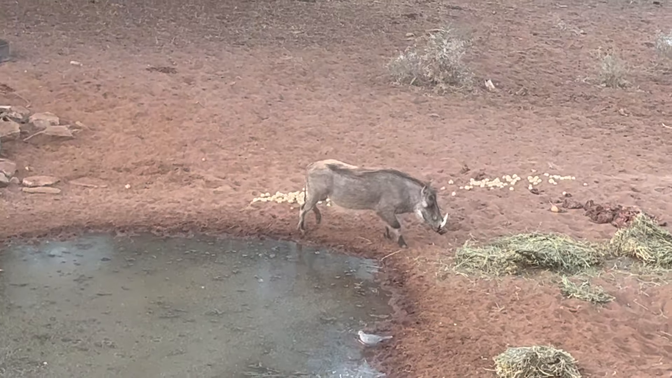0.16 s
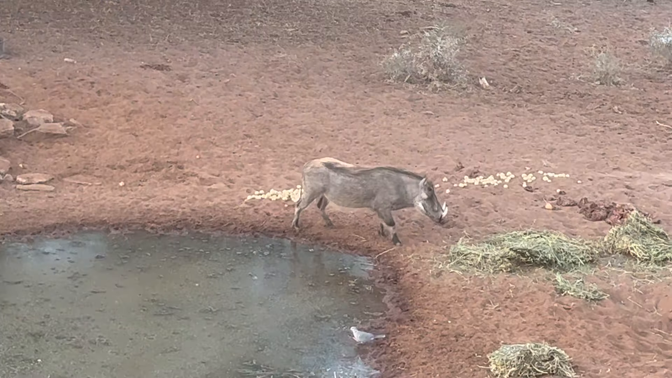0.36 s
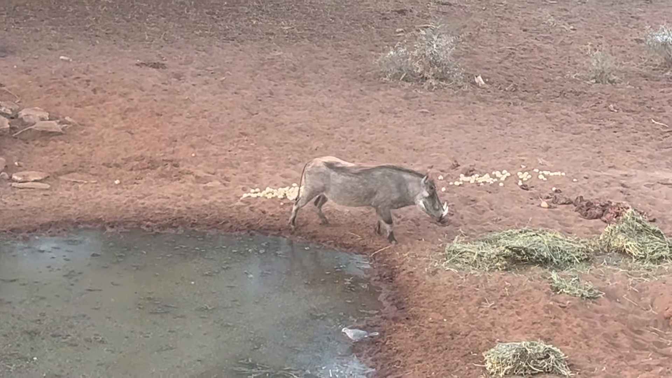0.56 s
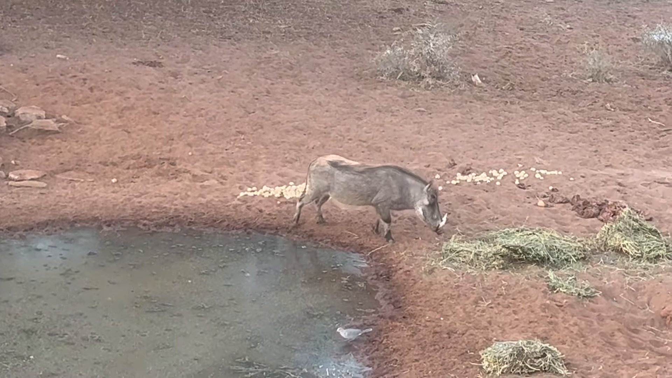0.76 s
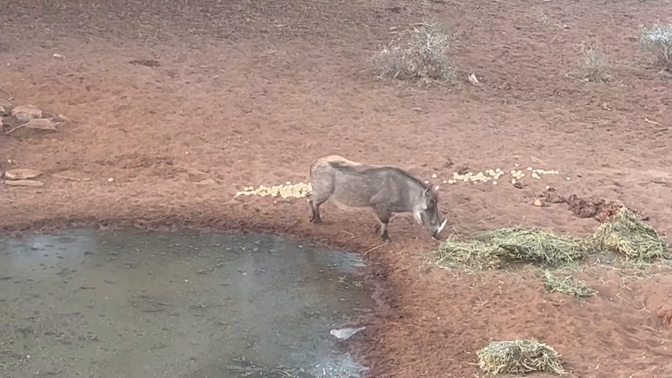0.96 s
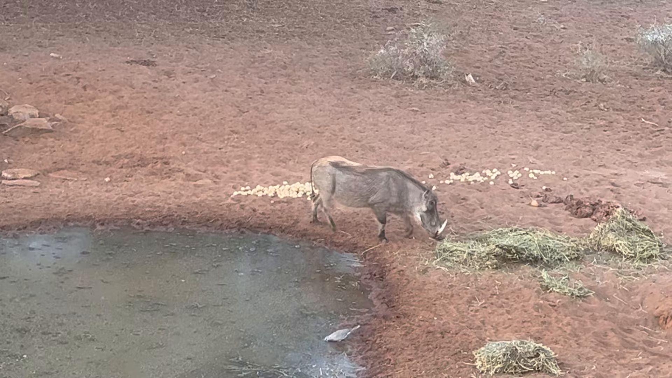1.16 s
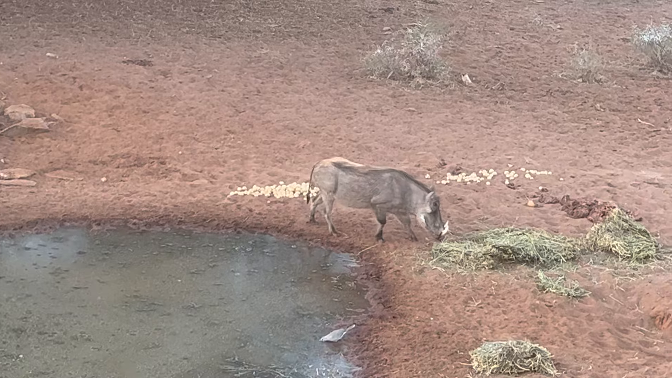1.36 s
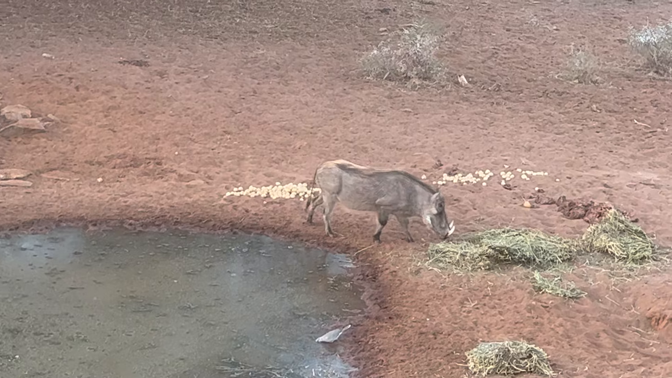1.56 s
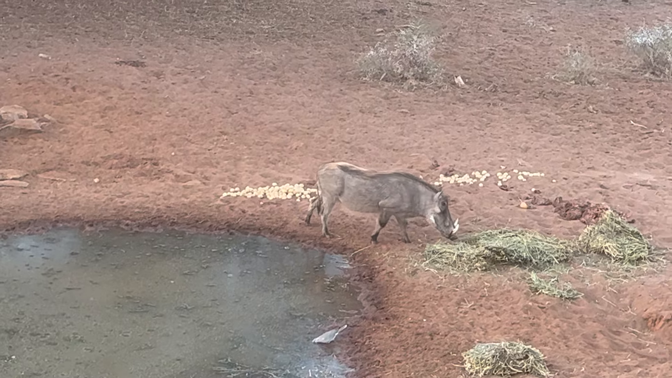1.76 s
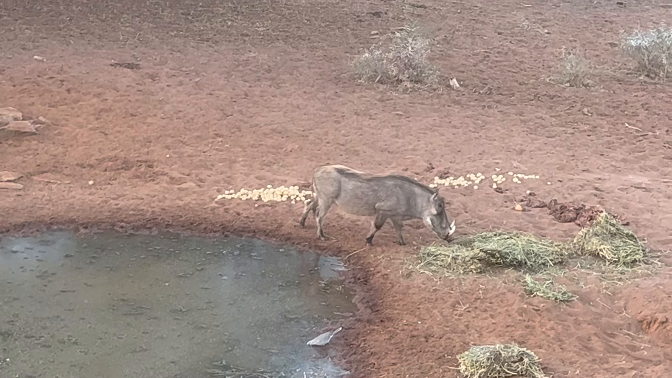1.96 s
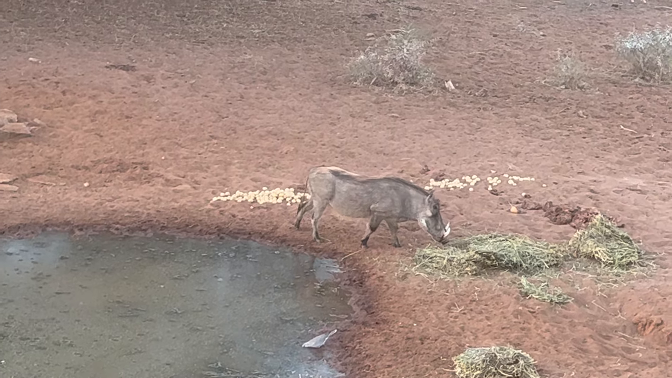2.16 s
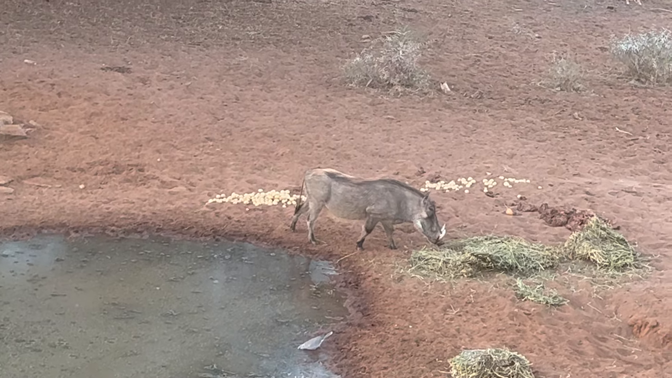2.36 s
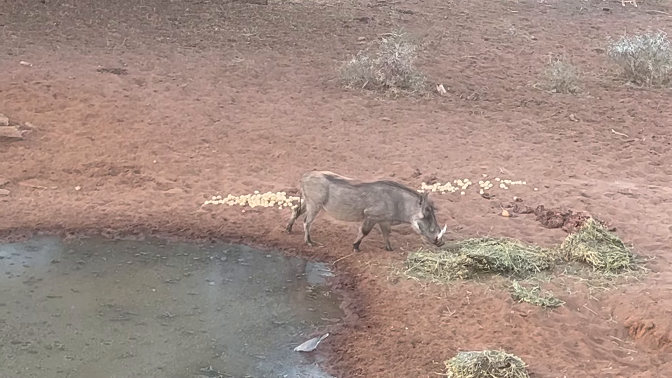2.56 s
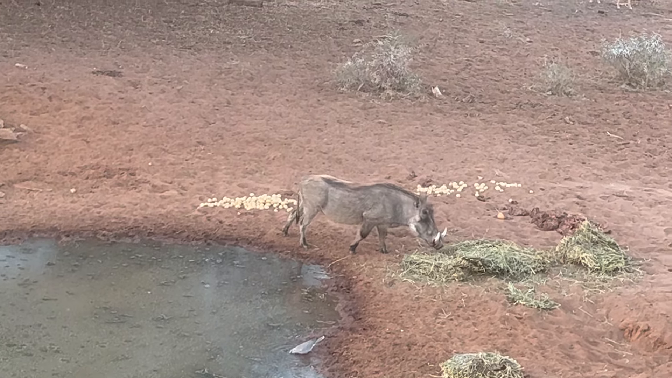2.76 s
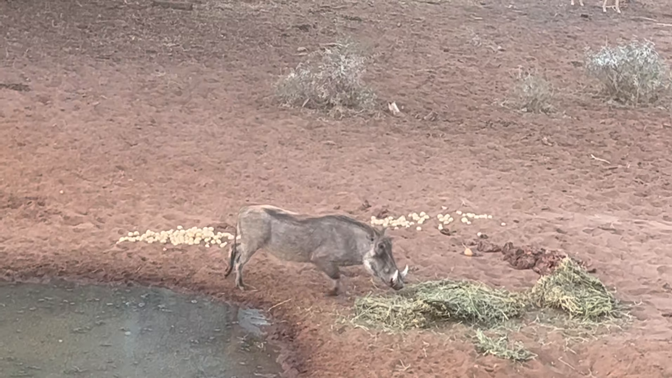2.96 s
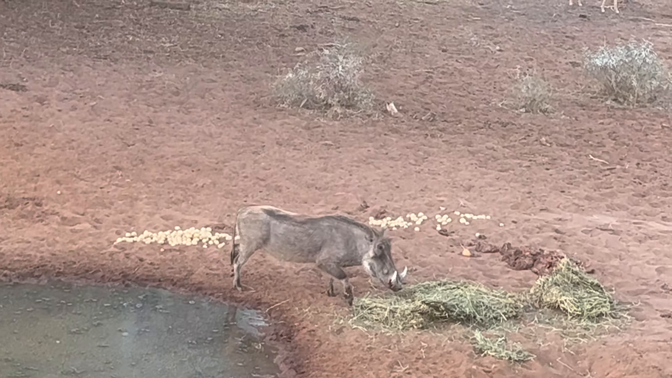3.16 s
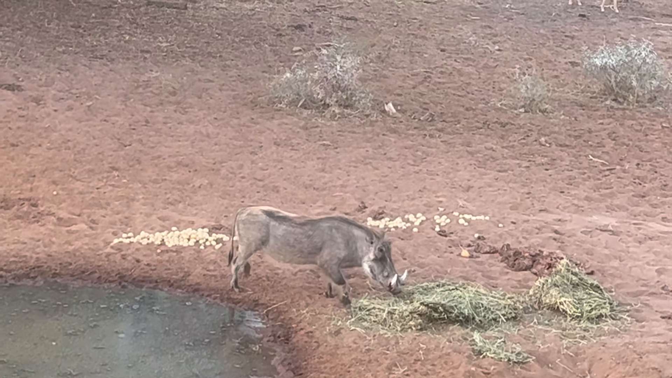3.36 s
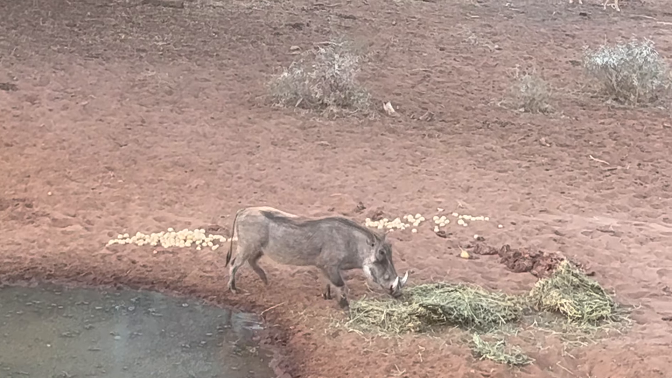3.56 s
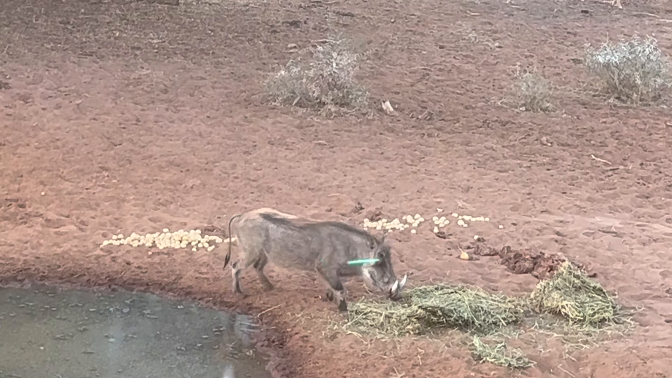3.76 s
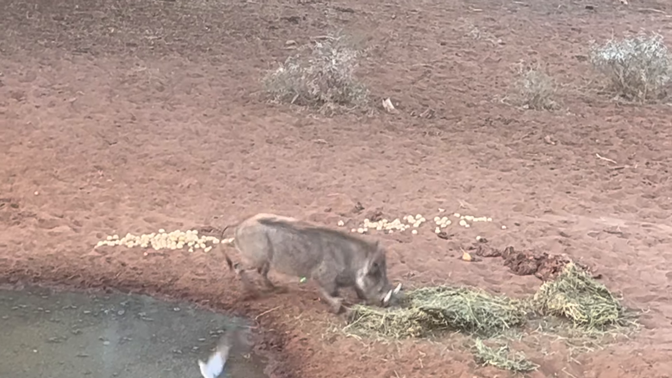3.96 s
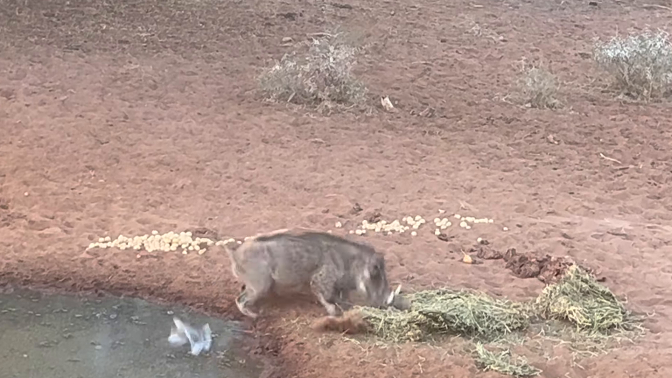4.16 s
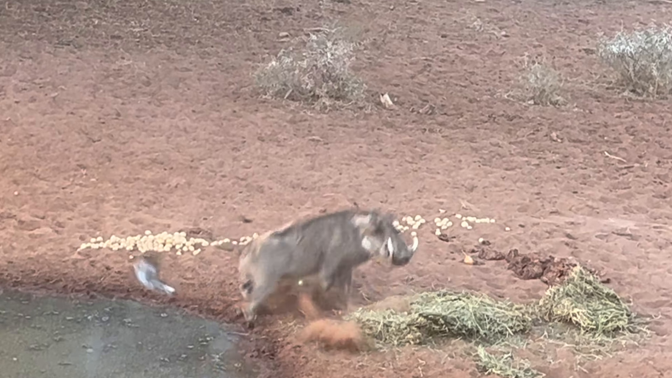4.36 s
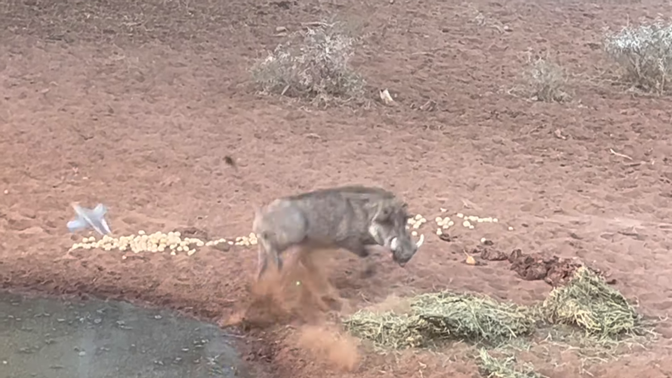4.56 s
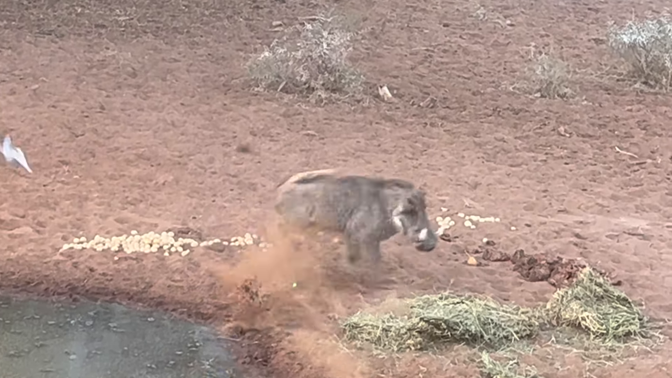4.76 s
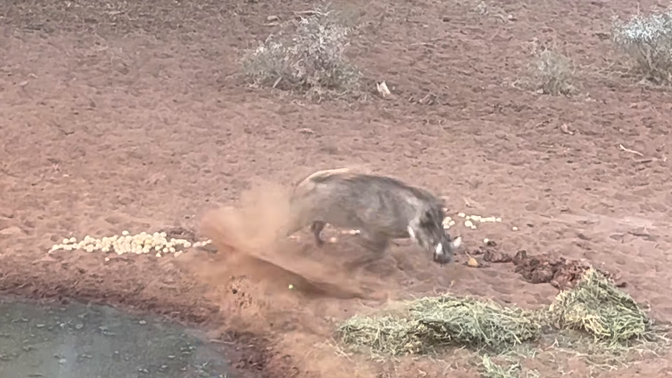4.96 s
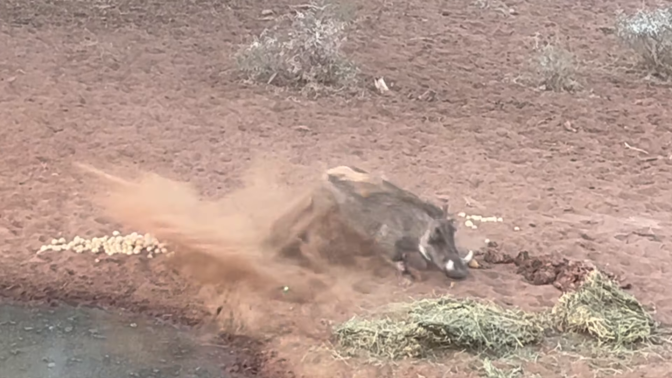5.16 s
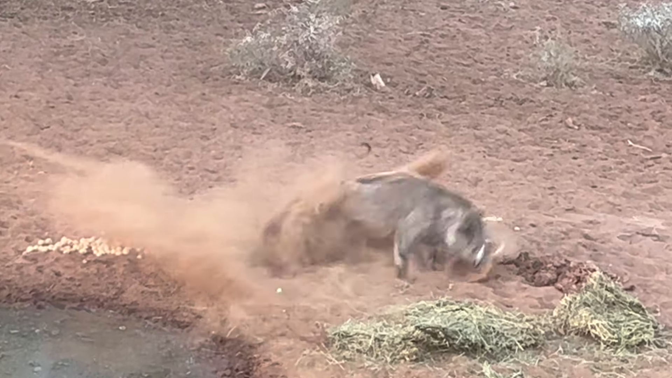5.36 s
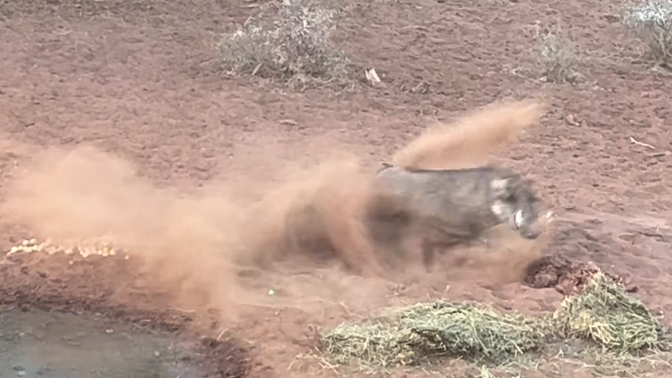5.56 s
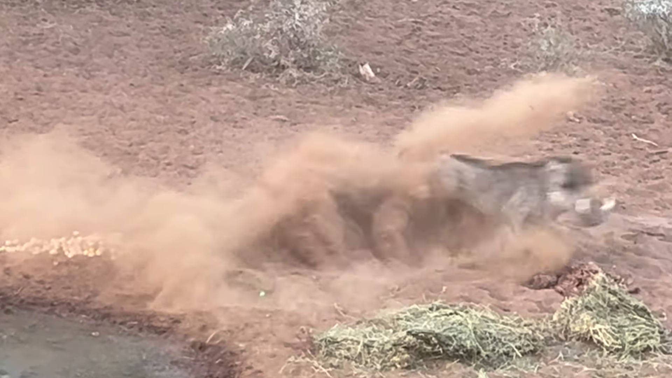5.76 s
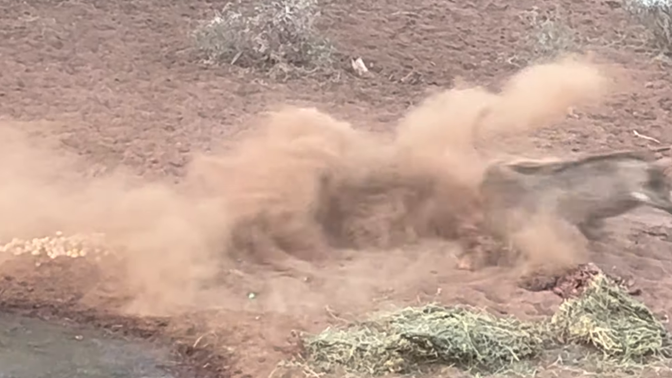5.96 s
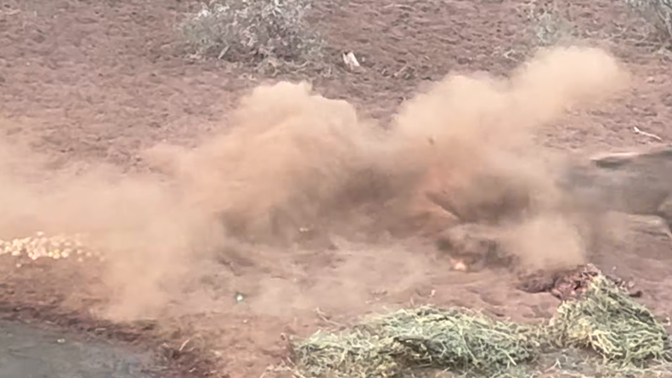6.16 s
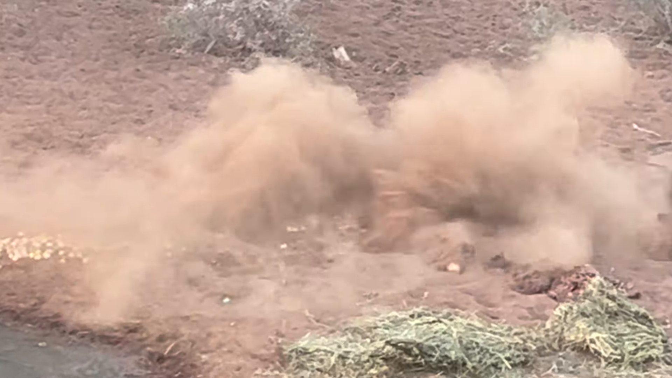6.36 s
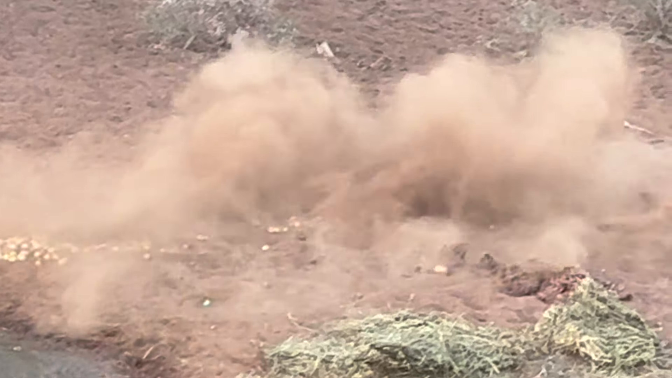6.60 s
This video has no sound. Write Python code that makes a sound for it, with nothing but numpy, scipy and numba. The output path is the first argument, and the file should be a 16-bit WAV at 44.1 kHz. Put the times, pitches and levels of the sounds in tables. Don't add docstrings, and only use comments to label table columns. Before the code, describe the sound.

Stereo handheld pickup from a hide, with a loose, phasey treble. First a calm of faint twittering birds, short coos, ticks and puffs of wind; then an abrupt change to half speed. A brief breathy whistle and sliding shaft lead to one enormous crack with a ringing thump, followed by a smaller arrow impact. Coarse low pig growls rattle over stamping, sandy scuffling, then fade, leaving thuds and sharp grit clicks.

```python
import sys
import numpy as np
from scipy import signal
from scipy.fft import rfft, irfft
from scipy.io import wavfile
from scipy.ndimage import uniform_filter1d
from numba import njit

SR = 44100
rng = np.random.default_rng(int(sys.argv[2]) if len(sys.argv) > 2 else 0)


def level_to_linear(level):
    exponent = np.asarray(level, float) / 20
    return 10 ** exponent


def generate_wav(sig):
    pcm = np.round(np.clip(np.atleast_2d(sig).T, -1, 1) * 32767).astype(np.int16)
    wavfile.write(sys.argv[1], SR, pcm)


N = 292383
T = np.arange(N) / SR
F = np.fft.rfftfreq(N, 1 / SR)
CUT_S = 3.0

# [t/s, level/dB]
BREEZE = [(0, -93), (.2, -81), (.38, -91), (.6, -82.5), (.8, -87.5), (1.42, -87.5), (1.55, -77.5),
          (1.8, -74), (2.0, -84), (2.18, -89), (2.37, -85.5), (3.0, -91)]
# [f/Hz, density/dB]
LEAF_COLOUR = [(300, 3.5), (700, 2), (2000, 3), (5000, -5), (8000, -8.5), (10000, -17), (12000, -37)]
# [f/Hz, density/dB]
TOP_AIR_COLOUR = [(9000, -18), (10500, -7.5), (11200, 0.5), (16300, -3.0)]
# [start t/s, level/dB, hold/s]
BUFFETS = [
    (.1, -69, 0.094),
    (1.5, -62, 0.32),
    (1.9, -58, 0.02),
    (2.3, -61.5, 0.053),
]
# [f/Hz, density/dB]
BUFFET_COLOUR = [(12, -36), (20, -8.5), (75, -1.5), (229, -11.5), (306, -10), (619, -22), (1700, -27),
                 (3300, -110)]
# [start t/s, level/dB, hold/s]
CHATTER = [(0, -63.5, 0.22), (.38, -66, 0.085), (.55, -61.5, 0.1), (.72, -67.5, 0.015), (.81, -64, 0.08),
           (1.04, -67, 0.14), (1.24, -65.5, 0.14), (1.5, -69.5, 0.52), (1.98, -68, 0.035),
           (2.21, -74, 0.55), (2.92, -72, 0.052)]
# [f/Hz, density/dB]
FAR_FLOCK_COLOUR = [(1400, -18), (1800, 7), (4000, 8), (4300, -2), (5300, -8), (5900, -27)]
# [t/s, peak level/dB, f/Hz, t60/s]
BUMPS = [(0.046, -48.5, 64, 0.2), (0.225, -59, 248, 0.083), (0.872, -47, 312, 0.019),
         (1.168, -46.5, 206, 0.048), (1.991, -46, 342, 0.028), (1.991, -46, 800, 0.022),
         (3.755, -46, 570, .05), (3.83, -41, 229, 0.076), (4.06, -46, 199, .1), (4.094, -36.5, 211, 0.082),
         (5.181, -30.5, 38.2, 0.68), (5.367, -2.5, 311, 0.0073), (5.861, -38, 49.3, 0.12),
         (6.265, -27, 78.9, 0.12)]
# [t/s, peak level/dB, f/Hz]
FOWL = [(.05, -81, 3500), (.09, -71, 1920), (.13, -64, 1910), (.229, -63, 3580), (.4, -70, 3300),
        (.469, -66, 3450), (.557, -68, 2000), (.631, -60, 2150), (.815, -61, 2130), (.83, -75, 3100),
        (.875, -69, 2300), (1.105, -62, 3240), (1.138, -65, 2350), (1.235, -53, 2100), (1.24, -62, 3320),
        (1.289, -66, 3380), (1.347, -64.5, 2520), (1.413, -58, 3420), (1.515, -56, 1900),
        (2.082, -59, 3400), (2.221, -60, 2230), (2.688, -58.5, 3330), (2.768, -63, 3240)]
# [t/s, peak level/dB, f/Hz]
CLUCKS = [(0.054, -70, 2610), (0.152, -59.5, 2590), (0.185, -66, 2690), (0.284, -64, 2610),
          (0.384, -71, 2580), (0.404, -62, 2650), (0.5897, -61, 2530), (0.655, -60.5, 2520),
          (0.735, -59, 2600), (0.84, -68, 2640), (1.0146, -63.5, 2620), (1.105, -65.5, 2650),
          (1.1668, -65, 2535), (1.301, -62.5, 2620), (1.319, -65.5, 2590), (1.3656, -62, 2550),
          (1.4857, -62, 2500), (1.515, -62, 2520), (1.556, -59, 2630)]
# [t/s, peak level/dB]
CALM_TICKS = [(0.8244, -62), (0.8694, -64), (1.07, -55), (1.7094, -65), (1.93, -59), (1.9894, -64),
              (2.08, -66), (2.181, -56.5), (2.3494, -60), (2.894, -56.5), (2.9034, -58.5)]
# [t/s, peak level/dB, f/Hz]
DOVE = [(2.0582, -54, 1110), (2.108, -60, 1150), (2.148, -58, 1056), (2.246, -55, 1107),
        (2.3352, -55.5, 1060), (2.445, -58, 1110), (2.52, -60, 1135), (2.6933, -61.5, 1160),
        (2.76, -58, 1080), (2.86, -62, 1085), (2.952, -61.5, 1000), (3.426, -48, 1385), (3.3997, -59, 1130)]
# [t/s, level/dB]
SCUFFLE = [(3.0, -85), (3.24, -81.5), (3.28, -79.5), (3.46, -71), (3.85, -57), (4.3, -42), (4.8, -55),
           (5.05, -53.5), (5.35, -62), (5.75, -50), (6.04, -60), (6.25, -62), (6.43, -59.5), (6.63, -58.5)]
# [f/Hz, density/dB]
SAND_COLOUR = [(120, -5.5), (250, 4), (700, 9), (1500, 3), (3000, -30), (5000, -57.5)]
# [f/Hz, density/dB]
DUST_COLOUR = [(1500, 6.5), (3000, 2.5), (4500, 0), (6000, 4), (8000, -7), (9900, -15)]
# [start t/s, level/dB, hold/s]
STAMPS = [(3.495, -31.5, .03), (3.7, -45.5, 0.038), (3.9, -43, .16), (4.13, -32.5, 0.17), (4.46, -40, 0.18),
          (4.81, -31, 0.044), (5.13, -37.5, 0.027), (5.35, -39, .12), (5.68, -63.5, 0.021),
          (6.0, -50, 0.12), (6.23, -41, 0.077), (6.5, -53.5, .1)]
# [f/Hz, density/dB]
GROUND_COLOUR = [(11, -51), (18, -3.5), (38, -1.5), (133, -7.5), (264, -16), (490, -25.5), (650, -41),
                 (1100, -120)]
# [t/s, level/dB, f/Hz]
WHISTLE = [(3.26, -89, 1050), (3.29, -70, 1070), (3.315, -73, 1110), (3.33, -70, 1280), (3.355, -75, 1330),
           (3.385, -79, 1400)]
# [t/s, peak level/dB, dull side level/dB]
GRIT = [(3.327, -60.5, -25), (3.406, -63, -12), (4.0468, -55.5, 16), (5.0652, -68.5, -15), (5.11, -46.5, 2),
        (5.2787, -56, 14.5), (5.45, -59, 17), (5.66, -47, 14), (5.8194, -58, 12), (5.8308, -70, 33),
        (5.9598, -41, -34), (5.9796, -41.5, -16), (6.0364, -54, 6), (6.0544, -31.5, -7.5), (6.095, -59, 3),
        (6.1268, -41, -19), (6.1455, -32, -22), (6.1499, -37, -15), (6.1674, -50, 0), (6.206, -62, 14.5),
        (6.2207, -59.5, 17.5), (6.258, -38.5, -0.5), (6.401, -66, 17), (3.272, -78, 11), (5.462, -55, 11),
        (5.642, -58, 12), (6.08, -64, 3), (6.188, -60, 7)]
# [t/s, crack level/dB, crack f/Hz, thud level/dB, tail level/dB]
BLOWS = [
    (3.4337, -34, 4030, -76, -61.5),
    (3.4417, -19, 4700, -68.5, -57.5),
    (3.4476, -22, 6170, -56, -52),
    (3.482, -18.5, 1300, -71, -70),
    (3.4884, 0, 6970, -21.5, -22.5),
    (3.8783, -21, 5100, -22, -37),
    (3.883, -12, 2700, -57.5, -61.5),
    (3.901, -8, 2340, -46.5, -41),
]
# [f/Hz, level/dB, t60/s]
BOW_MODES = [(92.6, -13.5, 0.52), (172.5, -4.5, 0.45), (156.3, -7, 1.0), (547, -23.5, 1), (1476, 0.5, 0.2),
             (3500, 2.5, 0.071), (7420, 16, .035)]
# [f/Hz, level/dB, t60/s]
HIDE_MODES = [(87.4, -12.5, 0.97), (170, -21, 0.27), (402, -12.5, 0.21), (830, -5.5, 0.4),
              (1510, -0.5, 0.34), (2825, -5.5, 0.032), (4060, 0.5, 0.27), (6500, -13, 0.4),
              (8600, -34, .35)]
# [t/s, level/dB]
SHAFT = [
    (3.45, -41),
    (3.466, -37.5),
    (3.472, -28.5),
    (3.487, -38),
    (3.49, -41),
]
# [t/s, rate/Hz]
FLAP_RATE = [
    [(4.14, 25.5), (4.2, 27.9), (4.222, 57.7), (4.25, 23.6), (4.29, 36.6), (4.39, 40.9), (4.51, 35.3),
     (4.57, 46.8), (4.62, 32.2), (4.772, 23.1)],
    [(4.809, 29.9), (4.883, 34.7), (4.955, 38.3)],
    [(5.106, 35.1), (5.177, 19.8), (5.249, 21.0), (5.32, 23.3)],
    [(5.365, 18.3), (5.43, 31.4), (5.5, 27.6), (5.56, 36.8), (5.61, 31.4), (5.67, 50.0), (5.75, 32.9),
     (5.83, 33.9)],
]
# [t/s, effort level/dB, throat f/Hz, mouth opening/dB, chest f/Hz]
EFFORT = [
    [(4.15, -42.5, 593, -1, 128.8), (4.185, -34.5, 590, 5.5, 128.5), (4.245, -32.5, 636, -9.5, 189.5),
     (4.31, -33, 562, -8, 135.4), (4.41, -28, 570, 2, 115.4), (4.485, -32.5, 562, -5.5, 101.2),
     (4.55, -24, 620, -8, 120.5), (4.64, -25.5, 564, -9, 217), (4.79, -45.5, 555, -6.5, 219.6)],
    [(4.82, -34.5, 587, -13, 226.8), (4.86, -30.5, 443, -3.5, 216.1), (4.91, -33.5, 666, -5, 181.4),
     (5.03, -83, 670, 19, 170)],
    [(5.11, -54.5, 597, 6.5, 128.3), (5.2, -44, 705, -5.5, 162.8), (5.33, -59.5, 484, -1.5, 110.8)],
    [(5.375, -41, 452, -11.5, 208.3), (5.44, -44, 547, -2.5, 189), (5.49, -48, 720, 6.5, 145.8),
     (5.59, -58.5, 500, 11, 136), (5.66, -42, 584, 4, 114.6), (5.68, -28.5, 710, -2, 148),
     (5.735, -33, 715, -0.5, 155), (5.79, -55, 750, 1.5, 168), (5.96, -76.5, 660, 11, 137)],
]
# [t/s, cheek f/Hz, cheek level/dB, mouth f/Hz, nose f/Hz]
MOUTH_SHAPE = [
    [(4.145, 893, -18.5, 1434, 1984), (4.18, 920, -10.5, 1685, 1920), (4.213, 961, -11, 1390, 1800),
     (4.235, 1040, -3.5, 1390, 2300), (4.265, 830, -1, 1460, 1890), (4.3, 860, -7, 1494, 2020),
     (4.4, 714, -5.5, 1440, 1845), (4.48, 836, -6, 1510, 1760), (4.555, 716, -14, 1510, 2023),
     (4.735, 670, 0, 1360, 2045)],
    [(4.81, 788, -17, 1166, 2120), (4.845, 875, -5, 1690, 2284), (4.875, 728, -1.5, 1390, 1980),
     (4.93, 815, -5.5, 1330, 1540)],
    [(5.11, 894, -16, 1337, 2190), (5.18, 1030, -7, 1436, 1760), (5.3, 883, -26.5, 1410, 2280)],
    [(5.37, 980, -12, 1170, 1900), (5.44, 760, -11.5, 1310, 1590), (5.515, 765, -2.5, 1270, 1930),
     (5.6, 895, -12, 1240, 2040), (5.635, 862, -9, 1160, 1660), (5.675, 1040, -22.5, 1750, 2030),
     (5.705, 1202, 0.5, 1710, 2010), (5.8, 1164, -7, 1410, 1940)],
]
# [share of breath/0-1, leak between flaps/0-1, chest level/dB, rasp level/dB]
BREATH = [
    (.3, 0.03, -35, -9.5),
    (.4, 0.09, -36, -4.5),
    (.6, 0.16, -37.5, 0),
    (.75, 0.5, -42.5, -7.5),
]
# [f/Hz, width/Hz, level/dB]
RASP = [(1150, 500, -16), (1750, 900, -12), (2600, 700, -24), (3400, 700, -37), (6600, 1500, -40)]
# [f/Hz at full speed, phase/rad]
PORT_PHASE = [(0, 0.0), (1200, 0.23), (2200, -0.06), (3400, -0.63), (4600, -0.52), (5800, 0.57),
              (6800, 0.03), (7800, 0.74), (8600, 1.23), (9600, 2.98), (10400, 3.29), (13600, 6.33),
              (16600, 9.32), (19600, 13.44)]
# [f/Hz at full speed, likeness/0-1]
PORT_LIKE = [(60, .99), (200, .96), (550, .7), (1300, .62), (2000, .95), (10000, .998), (13000, .85),
             (16600, .995)]


def curve(rows, col):
    rows = np.array(rows)
    return np.interp(T, rows[:, 0], rows[:, col])


def level(x):
    return x / np.sqrt(np.mean(x ** 2))


@njit
def svf(x, hz, width):
    y, b, l = np.empty(len(x)), 0., 0.
    for i in range(len(x)):
        g, k = np.tan(np.pi * hz[i] / SR), width / hz[i]
        v = (b + g * (x[i] - l)) / (1 + g * (g + k))
        b, l, y[i] = 2 * v - b, l + 2 * g * v, k * v
    return y


def band(x, hz, width_hz):
    return svf(x, np.ones(len(x)) * hz, 1. * width_hz)


def walk(rate):
    k = int(SR / rate)
    steps = np.repeat(rng.standard_normal(N // k + 1), k)
    return 2.3 * uniform_filter1d(uniform_filter1d(steps, k), k)[:N]


def air(colour, flicker_db, rate):
    hz, db = np.transpose(colour)
    octave = np.log2(F + 1)
    spectrum = rfft(rng.standard_normal(N)) * level_to_linear(np.interp(octave, np.log2(hz), db, -90, -90))
    total = np.zeros(N)
    for centre in np.arange(np.floor(np.log2(hz[0])), np.log2(hz[-1]) + 1):
        part = irfft(spectrum * np.clip(1 - abs(octave - centre), 0, 1), N)
        total += level_to_linear(flicker_db * walk(rate)) * part
    return level(total)


def bursts(rows, attack_s, release_s):
    power = 0
    for s, db, hold in rows:
        t = T - s
        dying = np.exp(-np.clip(t - attack_s - hold, 0, None) / release_s)
        power = power + (level_to_linear(db) * np.clip(t / attack_s, 0, 1) * dying) ** 2
    return np.sqrt(power)


def add(track, s, sound):
    i = int(s * SR)
    track[i:i + len(sound)] += sound[:N - i]


def fall(t, t60):
    return level_to_linear(-60 * t / max(t60, .002))


def bird_notes(rows, length_s, partner, partner_db, rough):
    out, u = np.zeros(N), np.linspace(0, 1, int(length_s * SR))
    for s, db, hz, glide in rows:
        pitch = hz * np.clip(glide, 2 / 3, 1) ** (2 * u ** 2 - .3)
        phase = 2 * np.pi * np.cumsum(pitch) / SR
        ratio = partner if hz * partner < 4220 else 1 / partner
        tone = np.sin(phase) + level_to_linear(partner_db) * np.sin(ratio * phase)
        add(out, s - .005, level_to_linear(db - 10.5) * np.sin(np.pi * u) * tone)
    out = out * (1 + rough * walk(150))
    t = T[:SR // 5]
    echo = rng.standard_normal(len(t)) * fall(t, 0.24)
    return out + level_to_linear(-32) * signal.fftconvolve(out, echo)[:N]


def breeze():
    gust = curve(BREEZE, 1)
    leaves = level_to_linear(gust + 9.5) * air(LEAF_COLOUR, 0.22, 3.9)
    return leaves + level_to_linear(0.59 * gust - 34.5) * air(TOP_AIR_COLOUR, 1.4, 29.97)


def buffets():
    return np.hypot(level_to_linear(-71.0), bursts(BUFFETS, 0.048, 0.13)) * air(BUFFET_COLOUR, 2.05, 12)


def flock():
    chance = rng.random((260, 3))
    rows = [(0.013 + CUT_S * a, 0, 1900 + 2100 * b, 0.72 + 0.27 * c) for a, b, c in chance]
    chirps = level(bird_notes(rows, 0.032, 1.7, -3.1, 0.2))
    blur = air(FAR_FLOCK_COLOUR, 1.2, 21.9)
    gain = np.hypot(level_to_linear(-99), bursts(CHATTER, 0.0094, 0.085))
    return gain * (level_to_linear(-9.5) * chirps + level_to_linear(-13) * blur)


def bumps():
    out, t = np.zeros(N), T[:SR // 3]
    for s, db, hz, t60 in BUMPS:
        sinking = 1 - .5 * np.tanh(3 * t / t60)
        knock = np.sin(2 * np.pi * hz * t * sinking) * fall(t, t60)
        add(out, s, level_to_linear(db) * knock * np.clip(t * hz, 0, 1))
    return out


def fowl():
    glides = rng.uniform(.62, .74, len(FOWL))
    calls = bird_notes(np.c_[FOWL, glides], 0.035, 1.5, -2.8, .4)
    clucks = bird_notes([(*row, .97) for row in CLUCKS], 0.017, 1.5, 0.12, 0.36)
    return calls + level_to_linear(4.5) * clucks


def ticks(rows, hz, t60):
    out, t = np.zeros(N), T[:SR // 20]
    for s, db, dull_db in rows:
        noise = rng.standard_normal(len(t))
        click = level(band(noise, hz, 1.0 * hz)) + level_to_linear(dull_db) * level(band(noise, .5 * hz, 0.24 * hz))
        add(out, s, level_to_linear(db) * click * fall(t, t60))
    return out


def dove():
    return level_to_linear(-0.5) * bird_notes([(*row, .96) for row in DOVE], 0.024, 1.5, -12.5, 0.71)


def hooves():
    scuffle = curve(SCUFFLE, 1)
    shaking = np.hypot(level_to_linear(np.clip(1.9 * scuffle + 62, -79, -51)), bursts(STAMPS, 0.0086, 0.078))
    ground = shaking * air(GROUND_COLOUR, 2.4, 9.2)
    sand = level_to_linear(scuffle) * air(SAND_COLOUR, 3.5, 25)
    extra_drop_db = 1.0 * np.minimum(scuffle + 69, 0)
    dust = level_to_linear(0.56 * scuffle - 29.5 + extra_drop_db) * air(DUST_COLOUR, 3.0, 40)
    return ground + sand + dust


def whistle():
    breath = level(band(rng.standard_normal(N), curve(WHISTLE, 2), 60))
    sounding = (T > WHISTLE[0][0]) * (T < WHISTLE[-1][0])
    return level_to_linear(curve(WHISTLE, 1) + 1.5 * walk(85.0)) * breath * sounding


def bow():
    out, t = np.zeros(N), T[:SR]
    for s, crack_db, hz, thud_db, tail_db in BLOWS:
        t60 = 0.034 if s < 3.7 else 0.018
        crack = level(band(rng.standard_normal(SR), hz, hz)) * fall(t, t60) * np.clip(t / 0.002, 0, 1)
        thud = level(band(rng.standard_normal(SR), 120.0, 190)) * fall(t, 0.19) * np.clip(t / 0.011, 0, 1)
        tail = np.zeros(SR)
        for f, db, d in HIDE_MODES:
            tail += level_to_linear(db) * level(band(rng.standard_normal(SR), f, 0.48 * f)) * fall(t, d)
        tail *= np.clip(t / 0.0065, 0, 1)
        add(out, s, level_to_linear(crack_db - 4.5) * crack + level_to_linear(thud_db) * thud + level_to_linear(tail_db) * tail)
    release_s = BLOWS[4][0]
    push = rng.standard_normal(SR // 50) * fall(T[:SR // 50], 0.022)
    string = sum(level_to_linear(db) * np.sin(2 * np.pi * hz * t) * fall(t, d) for hz, db, d in BOW_MODES[4:])
    add(out, release_s, level_to_linear(-43) * signal.fftconvolve(string, push))
    limbs = np.zeros(SR)
    for hz, db, d in BOW_MODES[:4]:
        limbs += level_to_linear(db + 1.6 * walk(37)[:SR]) * np.sin(2 * np.pi * hz * t) * fall(t, d)
    add(out, release_s, level_to_linear(-24) * limbs * np.clip(t / 0.016, 0, 1))
    sliding = (T > SHAFT[0][0]) * (T < SHAFT[-1][0])
    return out + level_to_linear(curve(SHAFT, 1)) * sliding * level(band(rng.standard_normal(N), 4600, 7000))


def cavity(x, hz, first_hz, second_hz):
    return level(band(band(x, hz, first_hz), hz, second_hz))


def growl():
    rise_s, fall_s, knock_s = 0.0037, 0.0063, 0.000632
    swell_s = .009
    out = np.zeros(N)
    for flap, rows, shape, (share, leak, chest_db, rasp_db) in zip(FLAP_RATE, EFFORT, MOUTH_SHAPE, BREATH):
        i, j = int(flap[0][0] * SR), int(rows[-1][0] * SR)
        cycle = (np.cumsum(curve(flap, 1)[i:j]) / SR).astype(int)
        start = np.searchsorted(cycle, cycle)
        since = (np.arange(j - i) - start) / SR
        effort_db, throat, opening, chest = (curve(rows, c)[i:j] for c in range(1, 5))
        cheek, cheek_db, mouth, nose = (curve(shape, c)[i:j][start] for c in range(1, 5))
        chance = rng.standard_normal((60, 6))[cycle].T

        share = np.clip(share, 0, 1)
        leak = leak * (1 + share ** 2 * level_to_linear(effort_db + 25.5))
        share = np.clip(share * (1 + leak), 0, 1)
        knock = np.exp(-(since / knock_s - 2) ** 2) * np.cos(np.pi * since / knock_s)
        knock = level(knock + 0.2 * (since < knock_s))
        breath = rng.standard_normal(j - i)
        opened = (1 - np.exp(-since / rise_s)) * np.exp(-since / fall_s)
        puff = level((opened + 0.17 * leak) * breath) * level_to_linear(2.15 * chance[5])
        drive = (1 - share) * knock + share * puff
        mouth_drive = .3 * knock + puff

        chest_db = chest_db + 31.5 - (1 - 0.41) * (effort_db + 37.5) + 7 * np.log2(chest / 150)
        chest_db = chest_db + 4 * uniform_filter1d(chance[2], 300)
        hum = np.clip((chest - 175) / (205 - 175), 0, 1) * np.sin(2 * np.pi * np.cumsum(chest) / SR)
        chest = chest * (1 + .1 * uniform_filter1d(chance[4], 300))

        sag = 1 + .05 * (.7 - np.tanh(since / swell_s))
        throat = throat[start] * (1 + .03 * chance[2])
        mouth = mouth * (1 + .04 * chance[0]) * sag
        nose = nose * (1 + .06 * chance[1]) * sag
        mouth_db = -2.5 + opening + 1.3 * chance[3]
        nose_db = -7.5 + 1.3 * opening + 3.5 * chance[4]

        swell = np.sin(np.pi * np.clip(since / swell_s, 0, 1)) ** 2
        flutter = level(np.sin(2 * np.pi * throat * since) * swell) * level_to_linear(3.2 * chance[0])
        fluttering = level(band(flutter, throat, 110))
        voice = level((1 - share) * fluttering + share * cavity(puff, throat, 230, 110))
        voice += level_to_linear(cheek_db) * cavity(mouth_drive, cheek, 240, 120)
        voice += level_to_linear(mouth_db) * cavity(mouth_drive, mouth, 380, 180)
        voice += level_to_linear(nose_db) * cavity(mouth_drive, nose, 420, 220)
        voice += level_to_linear(chest_db) * (cavity(drive, chest, 100, 50) + level_to_linear(3) * hum)
        stream = puff + 1.7 * leak * breath
        wobble = 1 + 0.08 * chance[3]
        rasp = sum(level_to_linear(db) * cavity(stream, hz * wobble, 2 * w, w) for hz, w, db in RASP)
        voice += rasp * level_to_linear(.5 * opening + rasp_db + 2.0 * chance[1])
        ending = np.clip((j - i - np.arange(j - i)) / 600, 0, 1)
        out[i:j] += voice * level_to_linear(effort_db) * ending
    t = T[:SR // 2]
    wash = band(rng.standard_normal(len(t)), 606, 1100) * fall(t, 0.39) * (t > .012)
    return out + level_to_linear(-33) * signal.fftconvolve(out, wash)[:N]


def ports(x, speed, top_hz):
    hz = F / speed
    turn = np.exp(.5j * np.interp(hz, *np.transpose(PORT_PHASE)))
    like = np.clip(np.interp(hz, *np.transpose(PORT_LIKE)), 0, 1)
    scatter = 1j * rfft(x * level(walk(30))) * np.array([[1], [-1]])
    heard = np.sqrt((1 + like) / 2) * rfft(x) + np.sqrt((1 - like) / 2) * scatter
    both = np.array([1 / turn, turn]) * heard
    return irfft(both / (1 + (F / top_hz) ** 60), N)


def scene():
    calm = breeze() + buffets() + flock() + fowl()
    calm += ticks([(*row, -12) for row in CALM_TICKS], 13000, 0.012)
    throughout = bumps() + dove()
    shot = hooves() + whistle() + ticks(GRIT, 7340, .011) + bow() + growl()
    shot = 1.1 * np.tanh(shot / 1.1)
    calm *= np.exp(-np.clip(T - CUT_S, 0, None) / 0.095)
    full_speed = ports(calm + throughout * (T < CUT_S), 0.97, 15700)
    half_speed = ports((shot + throughout) * (T >= CUT_S), 0.4966, 9340)
    return full_speed + half_speed


def low_pass(x):
    return signal.sosfilt(signal.butter(12, 15750, fs=SR, output="sos"), x)


def record(dry):
    return low_pass(dry)


dry = scene()
out = record(dry)
generate_wav(out)
```